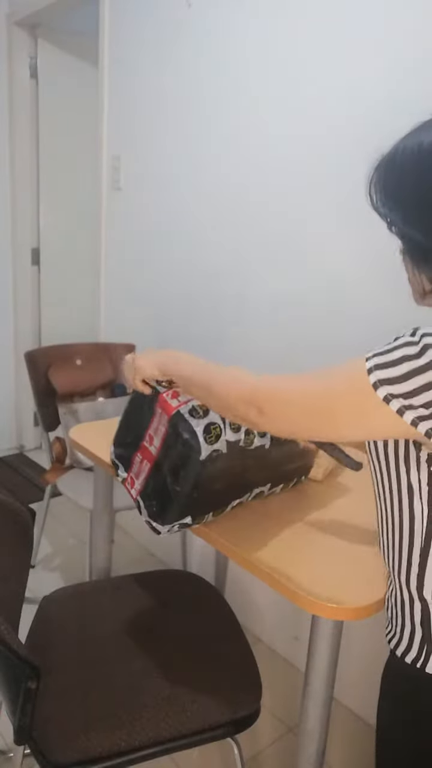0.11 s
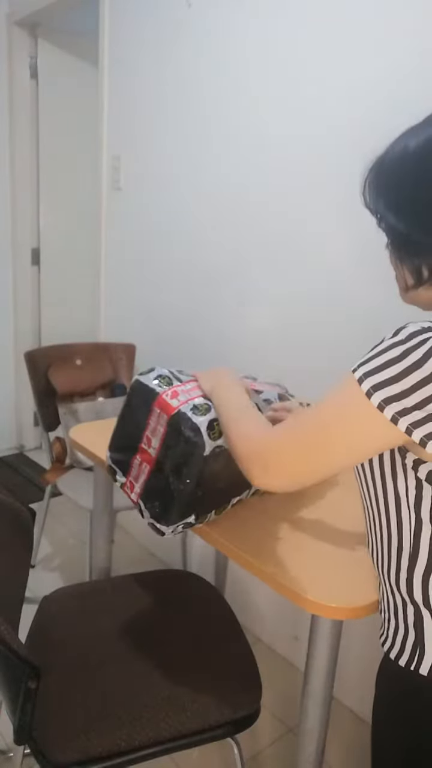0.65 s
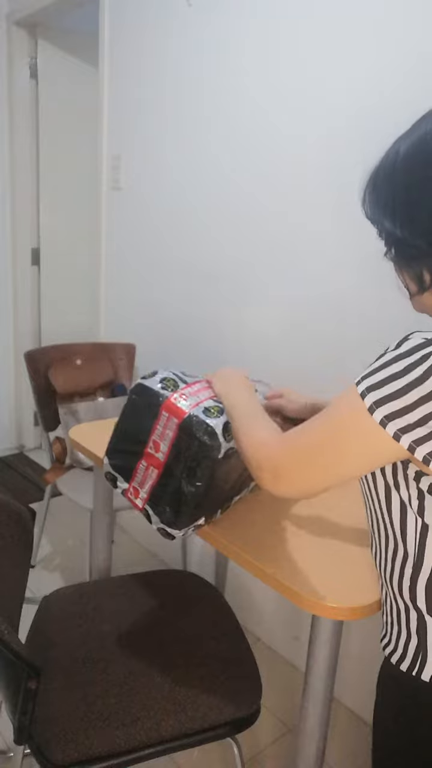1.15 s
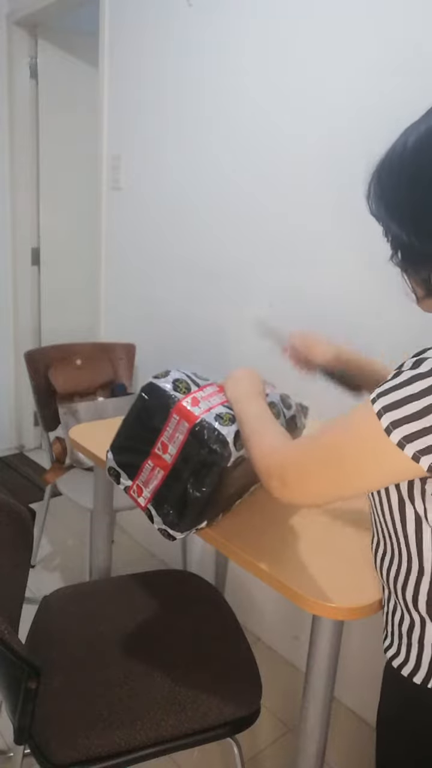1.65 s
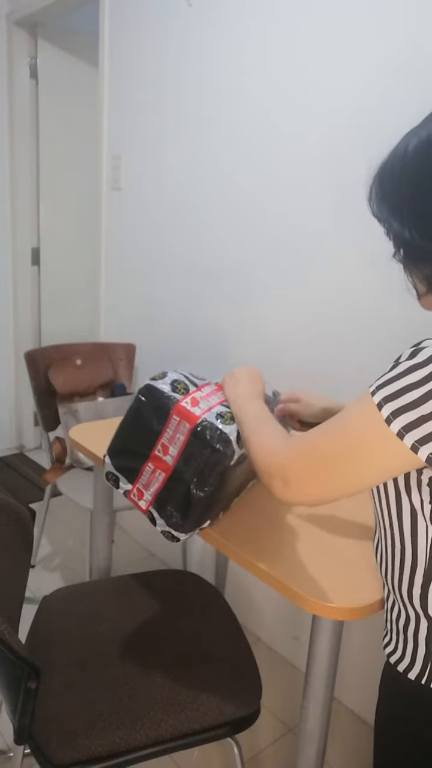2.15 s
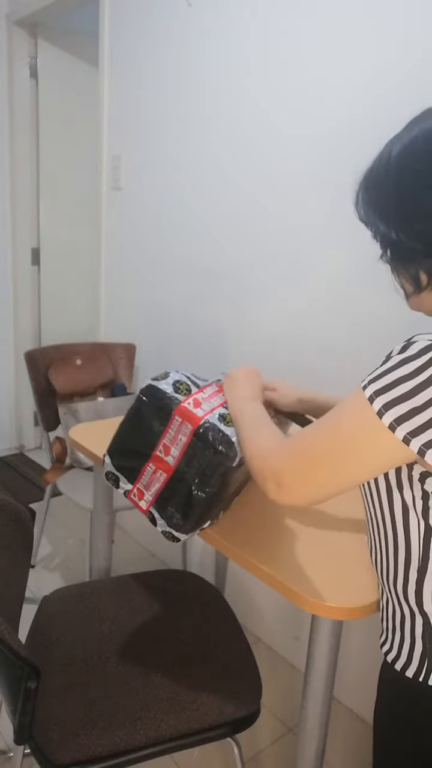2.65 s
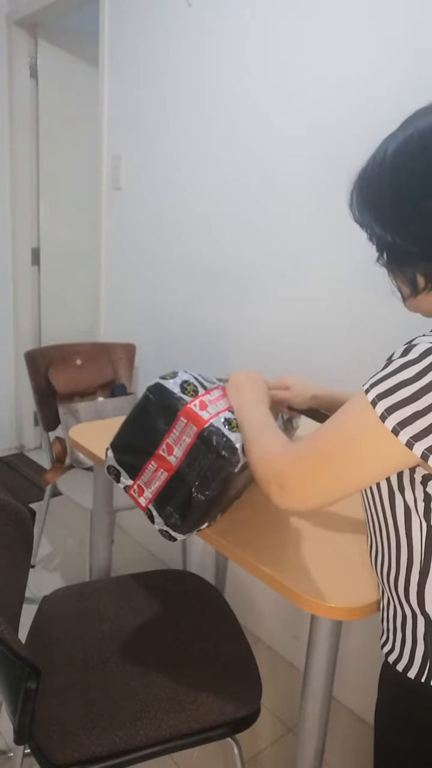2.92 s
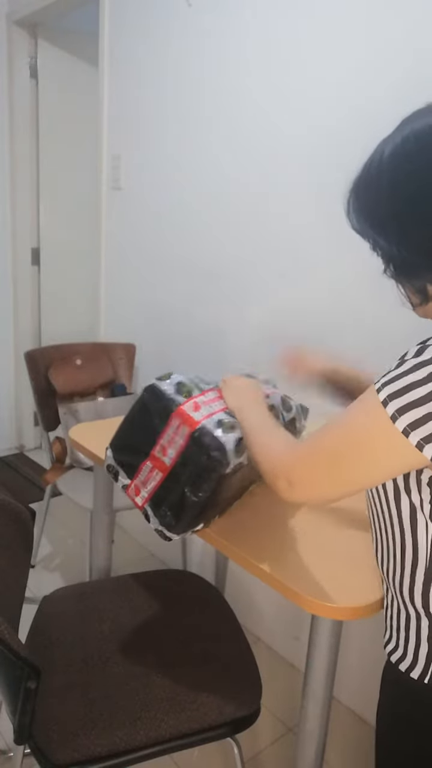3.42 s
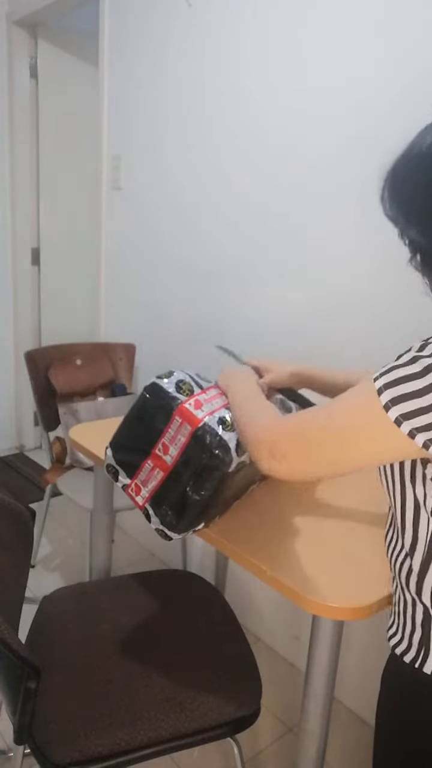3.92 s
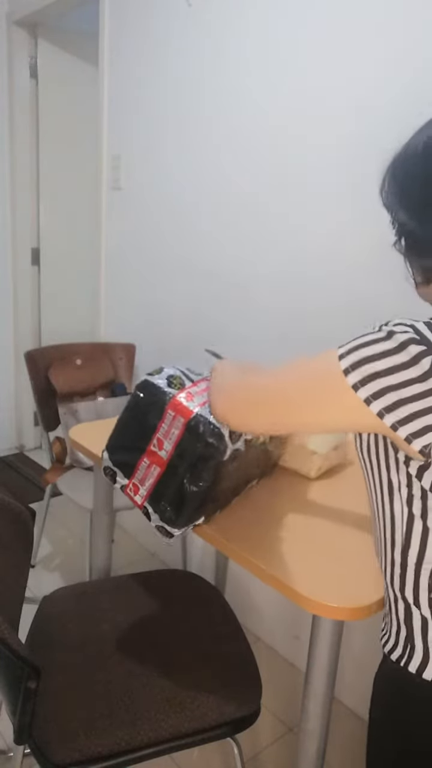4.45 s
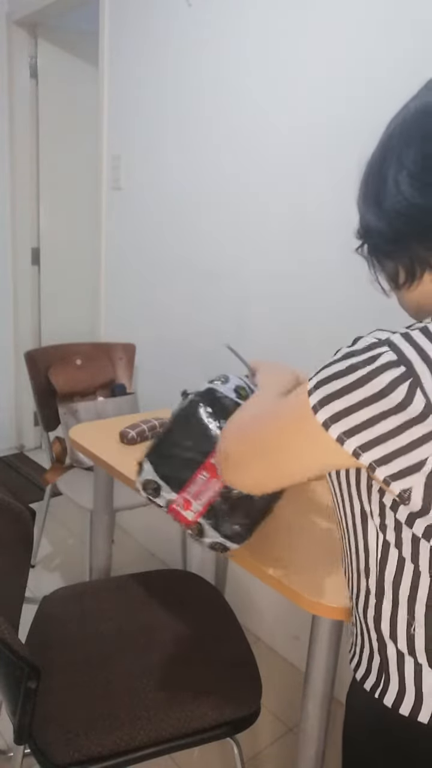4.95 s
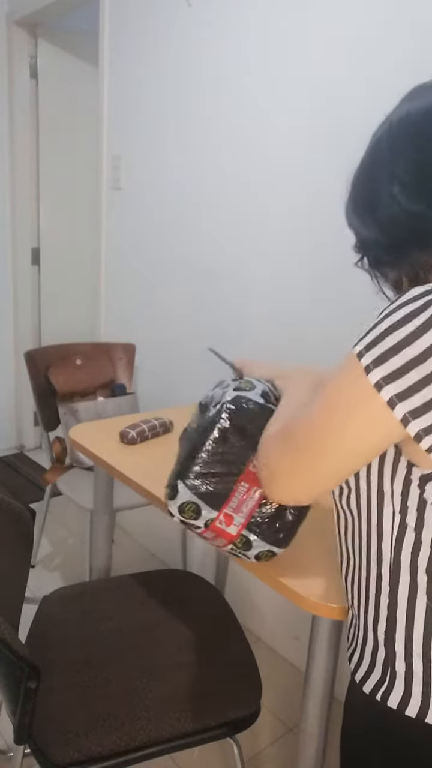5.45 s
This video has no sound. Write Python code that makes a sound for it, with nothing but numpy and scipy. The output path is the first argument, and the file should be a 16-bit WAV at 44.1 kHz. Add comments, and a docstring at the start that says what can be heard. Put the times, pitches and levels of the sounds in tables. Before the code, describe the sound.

In a bare, echoing room, plastic film on a parcel rustles faintly, then snaps sharply at about 1.3, 2.3 and 3.45 seconds as it is stabbed. After a quieter pause, a dense run of loud crackling tears fills the last second. Low hum, soft table thumps and microphone rumble lie beneath; the recorder ducks the peaks.

```python
"""In a bare, echoing room, stiff plastic wrap on a parcel is handled, stabbed and torn on a table.
Snaps are film-coloured pulses with a smeared top; rustle is clumps of tiny ones; patches ring at a pitch.
Early echoes and a dense tail of noise carry each sound on for most of a second.
A mains hum, a steady low noise, a gusty draught on the microphone and table thumps lie below.
The recorder turns loud moments down and recovers slowly."""
import sys
import numpy as np
from scipy import signal
from scipy.fft import rfft, irfft
from scipy.io import wavfile
from scipy.ndimage import uniform_filter1d, map_coordinates

SR = 44100
rng = np.random.default_rng(int(sys.argv[2]) if len(sys.argv) > 2 else 0)


def log_audio(samples):
    """Write samples as a 16-bit WAV file to the path given in sys.argv[1]."""
    # one column per channel
    frames = np.atleast_2d(samples).T
    # limit to full scale, then quantise
    limited = np.clip(frames, -1, 1)
    pcm = np.round(limited * 32767).astype(np.int16)
    wavfile.write(sys.argv[1], SR, pcm)


def undo_db(level):
    """Turn decibels back into plain size, where 20 dB means ten times bigger."""
    steps = np.asarray(level, float) / 20
    return 10 ** steps


N = 246078


def rms_one(x):
    """Scales a signal to an rms of 1."""
    return x / np.sqrt(np.mean(x ** 2) + 1e-20)


def at_hz(points, hz):
    """Reads a curve of (Hz, value) points along log frequency."""
    point_hz, values = np.transpose(points)
    return np.interp(np.log(hz), np.log(np.maximum(point_hz, 1)), values)


def band(x, low_hz, high_hz):
    """Keeps the range between two frequencies."""
    return signal.sosfilt(signal.butter(2, [low_hz, high_hz], "band", fs=SR, output="sos"), x)


def drift(rate):
    """Slow smooth chance of spread about 1, with `rate` new values a second."""
    knots = rng.standard_normal(600)
    return map_coordinates(knots, [np.arange(N) / SR * rate], order=3, mode="wrap")


def swells(start_s, length_s, rise, db):
    """Each row swells and fades in power over its length; overlapping rows add; returns gains."""
    power = np.zeros((db.shape[1], N))
    for start, length, row_db in zip(start_s, length_s, db):
        end = start + length
        span = slice(round(start * SR), round(end * SR))
        shape = np.interp(np.arange(N)[span] / SR, [start, start + rise * length, end], [0, 1, 0])
        power[:, span] += undo_db(row_db)[:, None] ** 2 * shape
    return np.sqrt(power)


# How alike left and right are in diffuse sound. Each row: frequency in Hz, likeness from -1 to 1.
STEREO_LIKENESS = [(60, 0.97), (150, 1), (380, 0.023), (950, -0.11), (2380, 0.1), (5980, -0.068),
                   (15000, -0.053)]


def banded_noise(length, gain_at):
    """Third-octave bands of stereo noise, each with its own gain and left-right likeness."""
    out, edges = 0, 25 * 2 ** (np.arange(29) / 3)
    white = rng.standard_normal((2, 2, length))
    for k, (low, high) in enumerate(zip(edges, edges[1:])):
        mid, side = band(white[k % 2], low, high)
        hz = np.sqrt(low * high)
        alike = at_hz(STEREO_LIKENESS, hz)
        pair = np.sqrt(1 + alike) * mid + np.sqrt(1 - alike) * side * [[1], [-1]]
        out = out + gain_at(hz) * pair / np.sqrt(2)
    return out


# Partials of the hum, near mains multiples. Each row: frequency in Hz, middle level in dB rms.
HUM_PARTIALS = [(122.5, -48.5), (62.6, -54.5), (240.3, -61)]


def hum():
    """Mains multiples from a motor; all pitches waver in proportion, each level by itself."""
    waver_hz, waver_db = 0.31, 0.5   # typical sizes, the pitch waver at the first partial
    t = np.arange(N) / SR
    turns = np.cumsum(waver_hz * drift(2.45)) / SR
    out = 0
    for hz, db in HUM_PARTIALS:
        level = undo_db(db + waver_db * drift(3.95)) * np.sqrt(2)
        out = out + level * np.sin(2 * np.pi * (hz * t + turns * hz / HUM_PARTIALS[0][0]))
    return out


# Colour of the steady noise, before it is set to its level.
# Each row: frequency in Hz, relative density in dB per Hz.
AIR_COLOUR = [(12, -31), (20, 7.5), (122, 0.5), (196, 1), (289, -20), (549, -17), (1980, -11),
              (4310, -20.5), (7310, -25.5), (8400, -33), (9390, -25.5), (11700, -36), (15500, -61)]


def air():
    """Steady, mostly low noise, coloured in third-octave bands and set to one rms level."""
    level_db = -46
    return undo_db(level_db) * rms_one(banded_noise(N, lambda hz: undo_db(at_hz(AIR_COLOUR, hz))))


# Blows that reach the table top. Each row: start in seconds, peak level in dB before a random flutter.
TABLE_THUMPS = [(1.313, -29), (2.291, -23.5), (3.453, -32), (4.758, -33), (4.976, -21), (5.209, -27.5)]


def table_thumps():
    """Gain of the blows that thump in the low range: a quick rise, then a fade."""
    length_s = 0.11
    start_s, db = np.transpose(TABLE_THUMPS)
    gain, = swells(start_s, np.full(len(start_s), length_s), 0.039, db[:, None])
    return gain


# Gusts on the microphone. Each row: start in seconds, length in seconds, rumble peak in dB,
# flutter peak in dB before a random flutter; the calm level comes on top.
DRAUGHT_GUSTS = [(0.0, 0.063, -33.5, -68), (0.132, 0.11, -37, -61), (0.383, 0.2, -47.5, -72),
                 (0.77, 0.41, -52, -63), (0.988, 0.13, -38, -67), (1.401, 0.13, -36, -27),
                 (1.497, 0.11, -48, -38), (1.638, 0.25, -36.5, -43.5), (1.87, 0.21, -46, -59),
                 (1.99, 0.24, -57, -54), (2.353, 0.16, -53, -32.5), (2.515, 0.25, -38.5, -52.5),
                 (2.784, 0.18, -47, -53), (2.987, 0.28, -47, -68), (3.3, 0.12, -59, -45),
                 (3.468, 0.16, -44, -27), (3.618, .12, -31, -21.5), (3.703, 0.17, -24.5, -26.5),
                 (3.857, 0.19, -32, -36), (4.04, 0.16, -43, -48.5), (4.184, 0.087, -32, -45),
                 (4.26, 0.099, -40.5, -47), (4.486, 0.27, -30.5, -42), (4.798, 0.17, -22, -23.5),
                 (4.966, 0.16, -32, -38.5), (5.08, 0.15, -24, -26.5), (5.232, 0.18, -35, -26),
                 (5.368, 0.12, -37, -52)]


def draught():
    """Lumpy low noise in gusts over a calm level, almost the same on both ports; thumps share its top."""
    rise = 0.14   # share of a gust's length
    calm_rumble_db, calm_flutter_db = -53.5, -71.5
    gusts = np.array(DRAUGHT_GUSTS)
    rumble, flutter = swells(gusts[:, 0], gusts[:, 1], rise, gusts[:, 2:])
    rumble, flutter = rumble + undo_db(calm_rumble_db), flutter + undo_db(calm_flutter_db)
    white = rng.standard_normal((4, N))
    deep = rumble * rms_one(band(white[0], 14.6, 36.5))
    middle = undo_db(1.0) * np.sqrt(rumble * flutter) * rms_one(band(white[3], 35.0, 123.0))
    ports = white[0] + undo_db(-13.0) * white[1:3]   # a little noise of its own on each port
    upper = rms_one(band(band(ports, 91, 296), 91, 296))
    lumps = undo_db(2.2 * drift(30.0))
    return deep + middle + (flutter + table_thumps()) * lumps * upper


# Early echoes off the table top and near walls.
# Each row: delay in seconds, left level in dB, right level in dB, both against the direct sound.
EARLY_ECHOES = [(.0024, -31, -2.5), (.0059, -6, -25), (.0078, -10.5, -6.5), (.0096, -6, -26),
                (0.014, -20, -26), (0.0195, -21, -9)]
# Dying time of the tail. Each row: frequency in Hz, time to fall by 60 dB in seconds.
TAIL_T60 = [(200, 0.54), (600, 0.65), (1500, 0.69), (4000, 0.62), (9000, 0.5), (15000, 0.4)]


def room(x):
    """Direct sound, a few early echoes, then a dense tail that dies by band; each call has its own tail."""
    direct_db, build_up_s = 20, 0.0051
    corner_share, corner_s = 0.35, 0.02   # the near corner thickens the first moments of the tail
    t = np.arange(SR) / SR
    answer = banded_noise(SR, lambda hz: undo_db(-60 * t / at_hz(TAIL_T60, hz)))
    answer *= 1 - np.exp(-t / build_up_s)
    answer *= 1 + corner_share * np.exp(-t / corner_s)
    answer[:, 0] += undo_db(direct_db)
    for delay_s, left_db, right_db in EARLY_ECHOES:
        answer[:, round(delay_s * SR)] += undo_db(direct_db + np.array([left_db, right_db]))
    return signal.fftconvolve(x[None], answer, axes=1)[:, :N]


def room_memory(hz):
    """Samples in which the tail's energy falls to 1/e."""
    return at_hz(TAIL_T60, hz) * SR / np.log(1e6)


def slips(chance, spread_db):
    """Tiny clicks of uneven size and random sign, with a given chance at each sample; rms 1."""
    sizes = undo_db(spread_db * np.minimum(rng.exponential(1, N), 4)) * rng.choice([-1, 1], N)
    return rms_one(sizes * (rng.random(N) < chance))


# Patches of film and carton with a pitch of their own, scraped or knocked. Each row: start in seconds,
# length in seconds, pitch in Hz, resonance width in Hz, level built up in the room in dB.
RINGING_PATCHES = [(0.202, 0.19, 2100, 500, -48), (1.306, 0.05, 260, 150, -23),
                   (1.32, 0.14, 5540, 1200, -31), (2.303, 0.13, 1320, 600, -22),
                   (3.254, 0.062, 1940, 302, -29.5), (3.256, 0.061, 2620, 250, -29),
                   (3.253, 0.062, 5070, 800, -33), (3.266, 0.031, 292, 40, -31),
                   (3.289, 0.059, 423, 59.6, -38), (3.278, 0.026, 780, 80, -30.5),
                   (3.442, 0.057, 316, 39.8, -19.5), (3.45, 0.099, 412, 24.6, -21.5),
                   (3.453, 0.069, 1145, 200, -13), (3.434, 0.19, 5040, 1160, -21.5),
                   (3.452, 0.087, 2910, 507, -16), (4.758, 0.016, 820, 256, -4.5),
                   (4.766, 0.021, 2920, 900, -3), (4.812, 0.012, 2510, 500, 0.5),
                   (4.824, 0.057, 2090, 500, -15), (4.972, 0.0092, 1900, 500, -2),
                   (5.194, 0.022, 1620, 400, -16), (5.322, 0.025, 1860, 495, -7),
                   (5.365, 0.017, 430, 81, -42)]


def patches(per_s, spread_db):
    """Uneven slips excite each patch's resonance, scaled to the level that they build up in the room."""
    rise = 0.21   # share of the length
    kicks, out = slips(per_s / SR, spread_db), np.zeros(N)
    for start, length, hz, width_hz, db in RINGING_PATCHES:
        gain, = swells([start], [length], rise, np.array([[db]]))
        ring = band(gain * kicks, hz - width_hz / 2, hz + width_hz / 2)
        out += ring * np.sqrt(SR / (2 * width_hz * room_memory(hz)))
    return out


# Borders in Hz between the film's five ranges: thud, body, middle, crisp, sizzle.
RANGE_BORDERS_HZ = (600, 1300, 3200, 7500)
# Colour of the film within the ranges. Each row: frequency in Hz, relative density in dB per Hz.
FILM_COLOUR = [(88, -46), (150, -4), (222, -2), (280, -6.5), (361, -3.5), (414, 1), (475, -4), (662, -8),
               (759, -3.5), (1250, -4.5), (1750, -1), (2310, -3), (2750, -7), (3250, -10.5), (4160, -13.5),
               (5570, -15), (11000, -19.5), (15100, -34), (16000, -75)]


def film_pulses():
    """The shortest causal pulse with the film's colour, split in five ranges of energy 1."""
    hz = np.maximum(np.arange(2049) * SR / 4096, 10)
    # folding the cepstrum forward gives the minimum-phase pulse
    cepstrum = irfft(np.log(undo_db(at_hz(FILM_COLOUR, hz))))
    cepstrum[1:2048] *= 2
    cepstrum[2049:] = 0
    pulse = irfft(np.exp(rfft(cepstrum)))
    kinds = [(RANGE_BORDERS_HZ[0], "low")]
    kinds += [(pair, "band") for pair in zip(RANGE_BORDERS_HZ, RANGE_BORDERS_HZ[1:])]
    kinds += [(RANGE_BORDERS_HZ[-1], "high")]
    parts = [signal.sosfilt(signal.butter(2, edge, kind, fs=SR, output="sos"), pulse) for edge, kind in kinds]
    # alternate signs keep neighbouring ranges in phase where they meet
    return [(-1) ** k * p / np.sqrt(np.sum(p ** 2)) for k, p in enumerate(parts)]


def coloured(kicks):
    """The kicks of each range set off their part of the film's pulse."""
    return sum(signal.oaconvolve(k, p)[:N] for k, p in zip(kicks, film_pulses()))


def range_levels(db, thud_db, body_db, sizzle_db):
    """Levels of the five ranges; the crisp range follows the sizzle in part."""
    crisp_db = 0.48 * sizzle_db - 4
    return db[:, None] + np.stack([thud_db, body_db, np.zeros_like(db), crisp_db, sizzle_db], axis=1)


# Hands rubbing and pulling the film. Each row: start in seconds, length in seconds,
# level built up in the room around 2 kHz in dB, then thud, body and sizzle in dB against that level.
HAND_STROKES = [(0.128, 0.12, -65, -8, -10, 4), (0.236, 0.24, -41, -6.5, -9, -2.5),
                (0.467, 0.19, -52, -5.5, -2.5, 5.5), (0.778, 0.2, -56, 2, -1, -2.5),
                (1.171, 0.15, -44.5, -6, -1, -3), (1.314, 0.42, -40, -8, -2.5, -14),
                (1.945, 0.027, -51.5, -20, 2, 0), (1.983, 0.03, -44.5, -20, 0, 14),
                (1.985, 0.26, -45, -28, -0.5, -3), (2.353, 0.12, -18.5, -42, 0, -17),
                (2.595, 0.31, -40, -45, -0.5, -23), (2.92, 0.64, -58.5, -11, -2.5, -0.5),
                (3.251, 0.046, -36, -25, -29, 8.5), (3.269, 0.052, -38, 9, 6, 2),
                (3.42, 0.037, -23, -8, -13, -12), (3.471, 0.08, -18.5, -22, -13, -25),
                (3.602, 0.18, -26.5, -11, -12.5, -17), (3.745, 0.32, -43, -17, -6, -12.5),
                (4.11, 0.13, -44.5, -7, -10, 1.5), (4.33, 0.16, -50.5, -8, -9, -1),
                (4.403, 0.75, -39.5, -10.5, -12, -9), (4.78, 0.11, -30, -20, -21, -27),
                (4.973, 0.18, -19.5, -13, 0, 4.5), (5.13, 0.035, -31, -28, -11, -27)]


def rustle(per_s, spread_db, clump_db):
    """Tiny creases of uneven size come in clumps, scaled to the level that they build up in the room."""
    rise = 0.19   # share of a stroke's length
    creases = slips(per_s * undo_db(clump_db * drift(40.0)) / SR, spread_db)
    memory = np.array([room_memory(hz) for hz in (400, 900, 2000, 5000, 10000)])   # one for each range
    start_s, length_s, *colour = np.transpose(HAND_STROKES)
    return swells(start_s, length_s, rise, range_levels(*colour)) * creases / np.sqrt(memory)[:, None]


def tear(lags):
    """A click smeared by a chain of short all-pass delays, which draw it out without changing its colour."""
    smear = 0.54
    out = signal.unit_impulse(400)
    for lag in lags:
        a = np.r_[1, np.zeros(lag - 1), smear]
        out = signal.lfilter(a[::-1], a, out)
    return out


# Single creases snapping. Each row: time in seconds, level left ringing in the room around 2 kHz in dB,
# then thud, body and sizzle in dB against that level.
CREASE_SNAPS = [(0.108, -73, -8, -12, -14), (0.1975, -40, -12, -15, -18), (0.212, -44.5, -17, -11, -8),
                (0.296, -46, -14, -10, -11), (0.53, -49, -10, -2, 4.5), (0.8416, -55.5, -6, -12, -2),
                (1.051, -60, -1, -2, 6), (1.1748, -39, -8, -4, -2.5), (1.3162, -23, -14, -7, -1.5),
                (1.3188, -21.5, -7, 0.5, -6), (1.323, -22, -5.5, -6, -0.5), (1.337, -20, -5.5, -10, -4),
                (1.889, -64.5, -17, -6, 2), (1.9904, -31.5, -38, -2.5, -30), (2.2908, -9, -20, -2.5, -22),
                (2.2986, -16, -11, -3, -8), (2.87, -47, -30, 2, -6.5), (2.9857, -46.5, -14, -5, -1.5),
                (3.4279, -33, -9, -8, -8), (3.45, -19.5, -18, -15, -14), (3.462, -12.5, -14.5, -10, -10),
                (3.472, -14.5, -11, -13, -7.5), (3.484, -16.5, -24, -10, -6), (4.1028, -42, -15, -10, -18),
                (4.122, -46, -11, -9, 3), (4.7603, -13.5, -21, -15, -17), (4.7651, -13, -26, -19, -16),
                (4.772, -10.5, -12, -3, -10), (4.8073, -8.5, -25, -7, -15.5),
                (4.8152, -10.5, -5.5, -1.5, -20), (4.821, -8.5, -14, -12, -10.5),
                (4.9741, -5, -19, -2.5, -16.5), (4.987, -3, -14.5, -4.5, -13), (5.013, -18, -17, 2, -18),
                (5.0409, -9, -31, -12, -14), (5.104, -24, -25, 4, 5), (5.2103, -4, -8.5, -6, -17),
                (5.2192, -12.5, -8, 5, -1.5), (5.2236, -13.5, -8, 7, 5), (5.3133, -8, -7.5, -1.5, -7.5),
                (5.322, -23, -10, 1, -10), (5.36, -38, -12, -8, -20)]


def snaps(count):
    """One kick a crease, dealt in turn to a few places on the parcel; its upper part is a very short tear."""
    longest_step_s = .0008
    times, *colour = np.transpose(CREASE_SNAPS)
    kicks = np.zeros((count, len(RANGE_BORDERS_HZ) + 1, N + 400))
    lags = 1 + (rng.uniform(.2, 1, (len(times), 3)) * longest_step_s * SR).astype(int)
    for k, (time, levels_db) in enumerate(zip(times, range_levels(*colour))):
        i = round(time * SR)
        kicks[k % count, :2, i] = undo_db(levels_db[:2])   # thud and body stay a plain click
        kicks[k % count, 2:, i:i + 400] = undo_db(levels_db[2:, None]) * tear(lags[k])
    return kicks[..., :N]


def scene():
    """The wrap sounds from several places in the room, over noise, draught and hum."""
    places = [*snaps(count=4), rustle(per_s=2500.0, spread_db=6.0, clump_db=2.5)]
    wrap = sum(room(coloured(kicks)) for kicks in places)
    wrap = wrap + room(patches(per_s=3000.0, spread_db=3.5))
    return wrap + air() + draught() + hum()


def roll_off(x):
    """The treble ends steeply here."""
    return signal.sosfilt(signal.butter(12, 16470, fs=SR, output="sos"), x)


# Colour difference of the two ports. Each row: frequency in Hz, left minus right in dB.
PORT_BALANCE = [(60, -2), (110, 1), (200, -0.5), (380, 2), (700, 1.5), (1290, 1.5), (2380, 3), (4400, 2),
                (8120, 3.5), (15000, -4.5)]


def record(dry):
    """The ports differ in colour; gain control follows the level and lets go slowly."""
    hz = np.maximum(np.fft.rfftfreq(N, 1 / SR), 1)
    tilt_db = at_hz(PORT_BALANCE, hz) / 2 * np.array([[1], [-1]])
    ports = irfft(rfft(dry) * undo_db(tilt_db), N)

    threshold_db, squeeze = -27.5, .56   # squeeze: dB of cut for each dB above the threshold
    attack_s, ahead_s, release_db_s = .0035, .0015, 90
    power = uniform_filter1d(np.mean(ports ** 2, 0), size=441, origin=220)   # over the past 10 ms
    level_db = 10 * np.log10(power + 1e-12)
    fall = release_db_s * np.arange(N) / SR
    held_db = np.maximum.accumulate(level_db + fall) - fall   # jumps up, falls at the release rate
    keep = np.exp(-1 / (attack_s * SR))
    cut_db = signal.lfilter([1 - keep], [1, -keep], squeeze * np.maximum(held_db - threshold_db, 0))
    ahead = round(ahead_s * SR)
    cut_db = np.r_[cut_db[ahead:], cut_db[-ahead:]]   # the cut comes earlier against the sound

    # a second, slow stage stays down after a long loud stretch
    settle_s, settle_share = .5, .55
    keep = np.exp(-1 / (settle_s * SR))
    cut_db = cut_db + settle_share * signal.lfilter([1 - keep], [1, -keep], cut_db)
    mix = np.clip(ports * undo_db(-cut_db), -.95, .95)
    return roll_off(mix)


dry = scene()
out = record(dry)
log_audio(out)
```